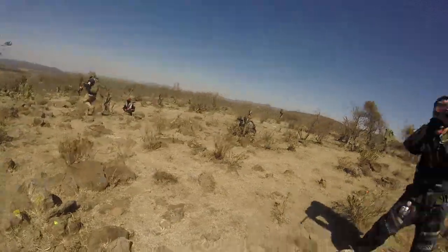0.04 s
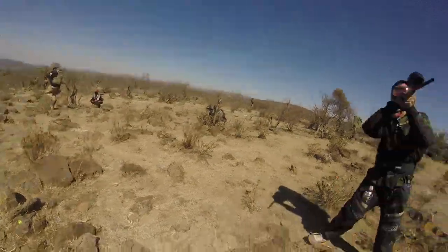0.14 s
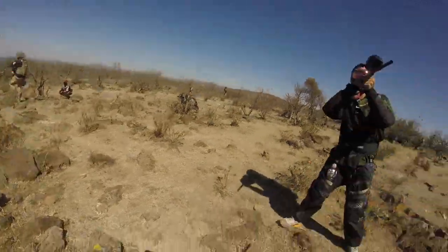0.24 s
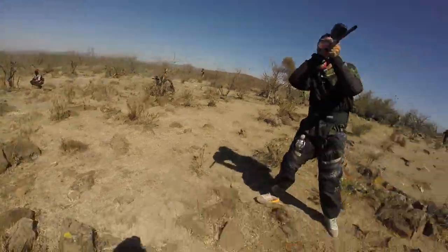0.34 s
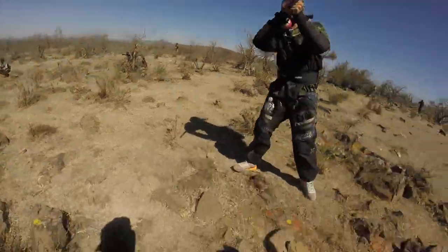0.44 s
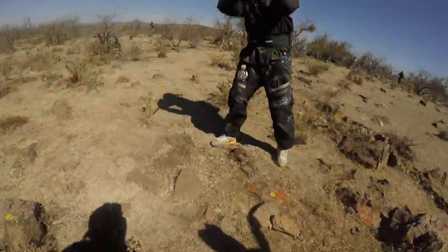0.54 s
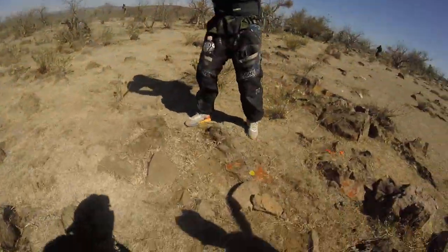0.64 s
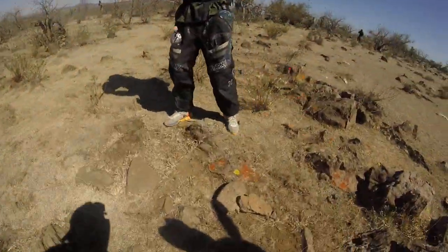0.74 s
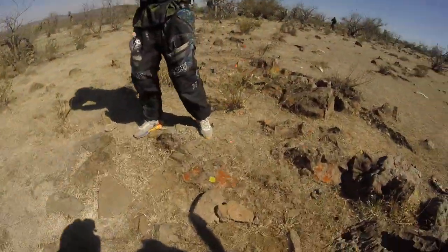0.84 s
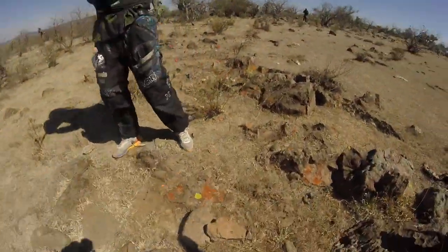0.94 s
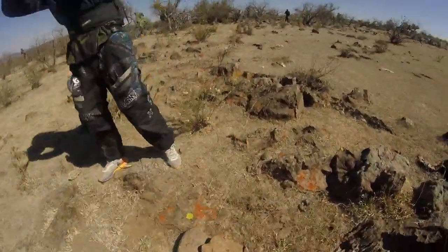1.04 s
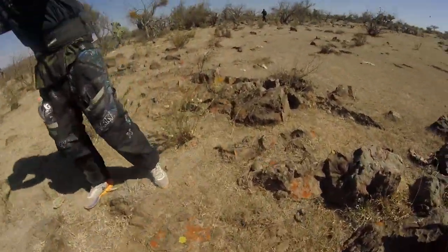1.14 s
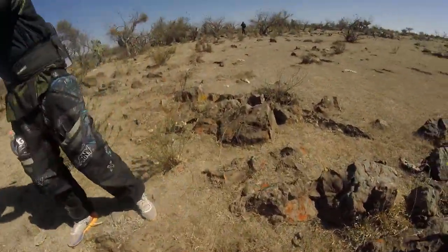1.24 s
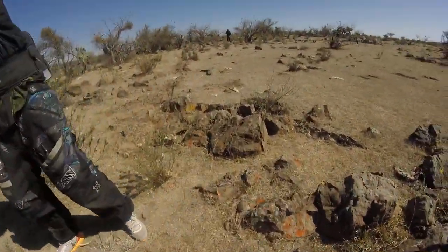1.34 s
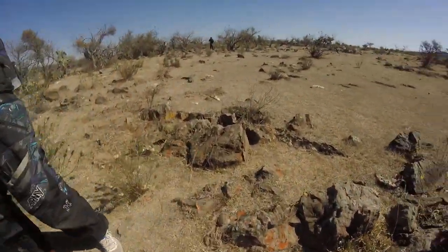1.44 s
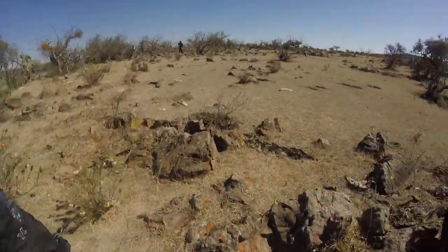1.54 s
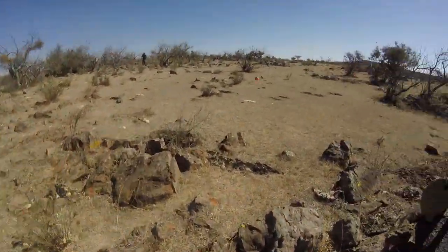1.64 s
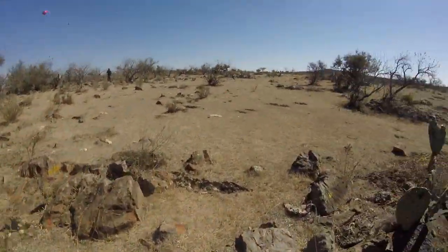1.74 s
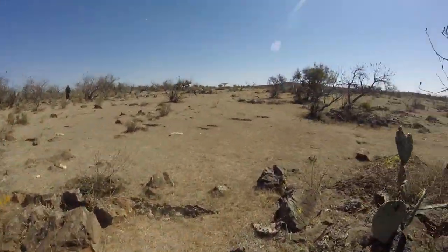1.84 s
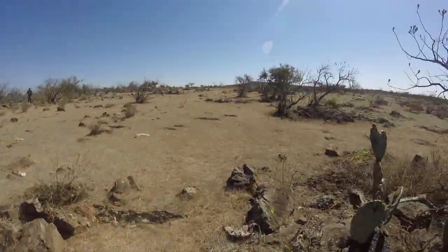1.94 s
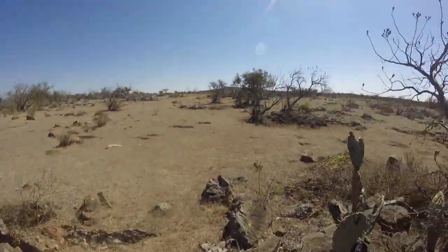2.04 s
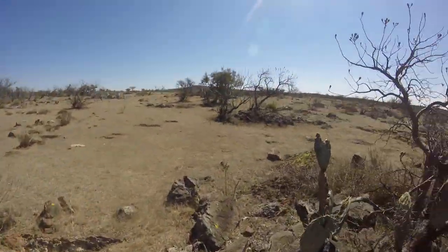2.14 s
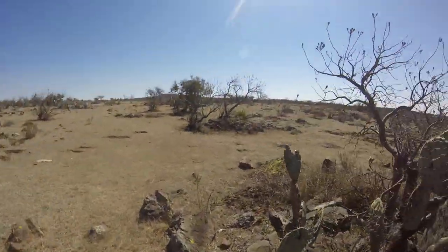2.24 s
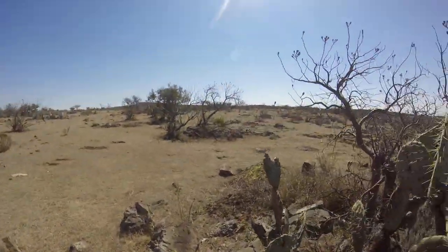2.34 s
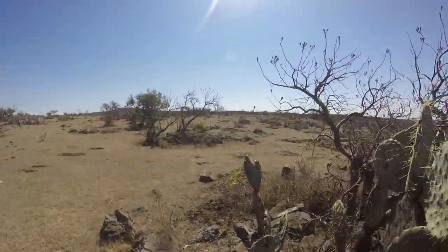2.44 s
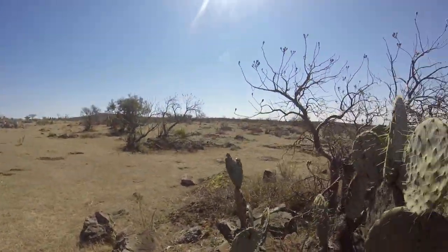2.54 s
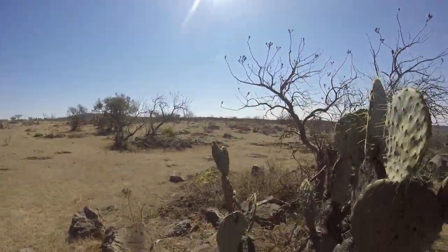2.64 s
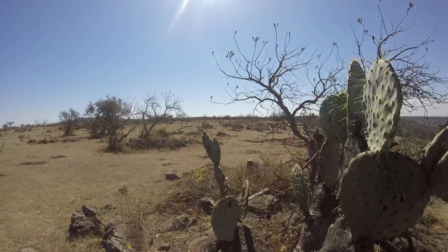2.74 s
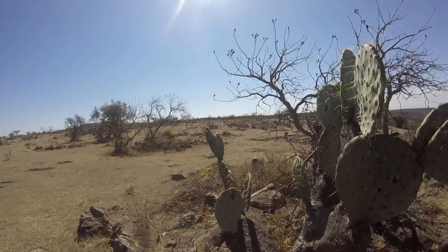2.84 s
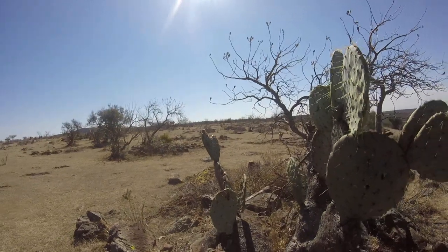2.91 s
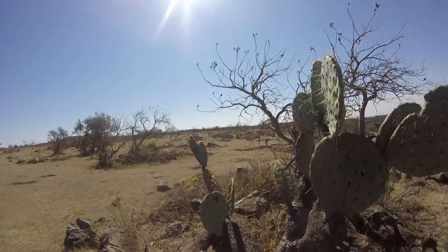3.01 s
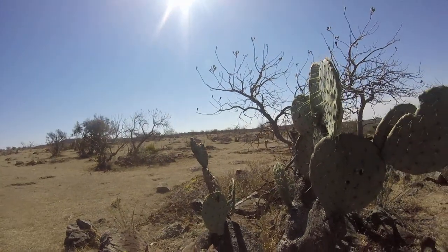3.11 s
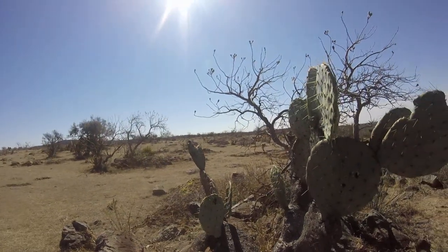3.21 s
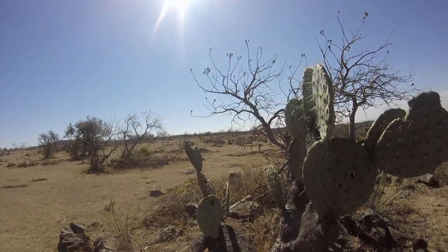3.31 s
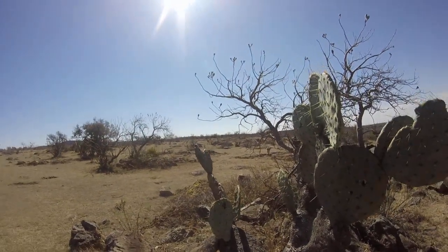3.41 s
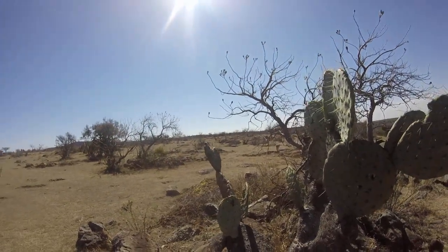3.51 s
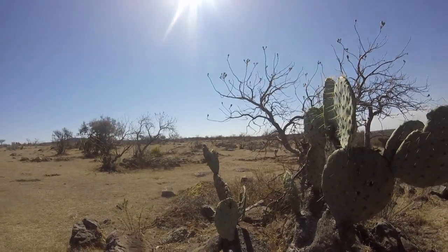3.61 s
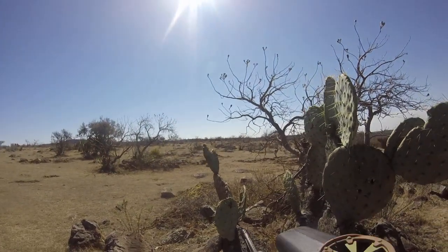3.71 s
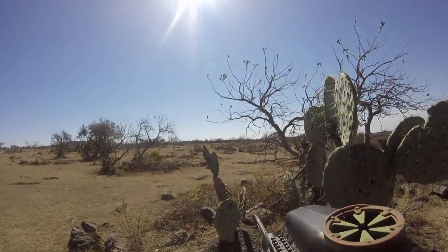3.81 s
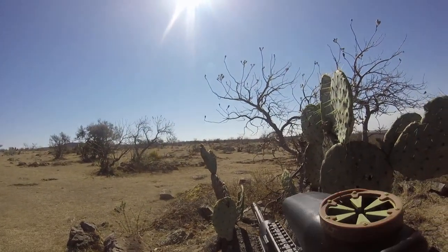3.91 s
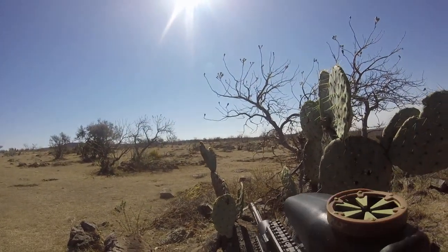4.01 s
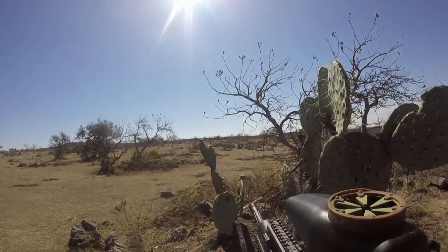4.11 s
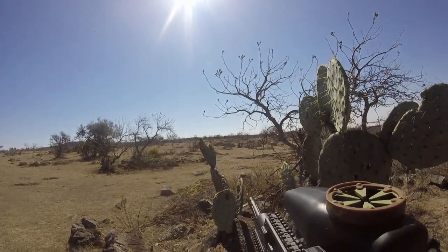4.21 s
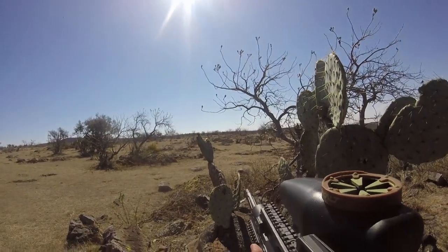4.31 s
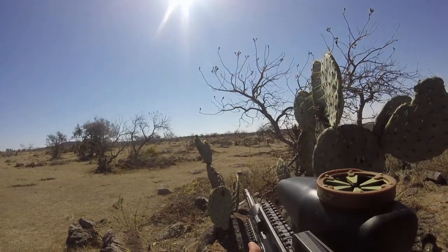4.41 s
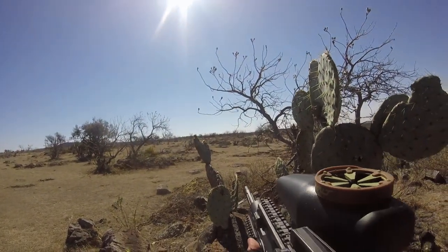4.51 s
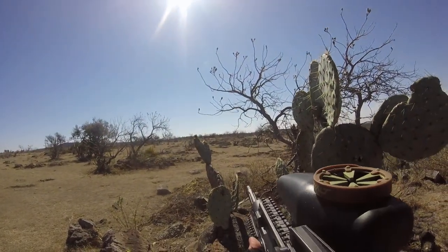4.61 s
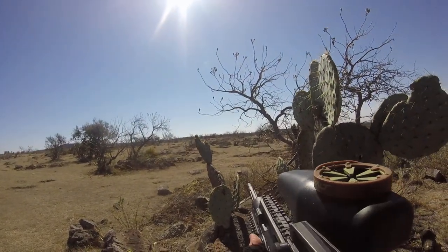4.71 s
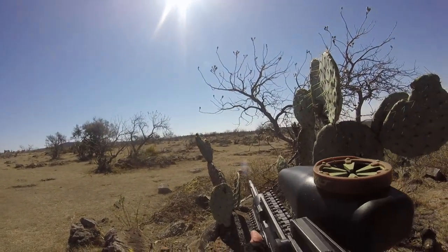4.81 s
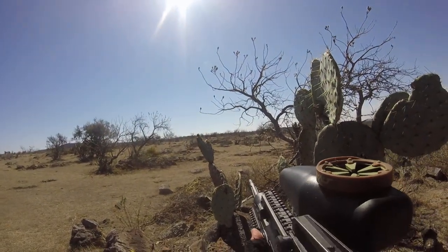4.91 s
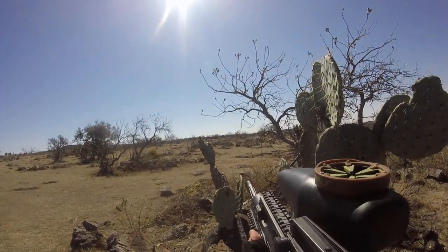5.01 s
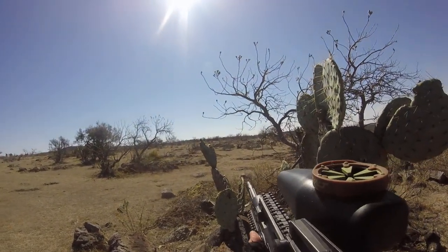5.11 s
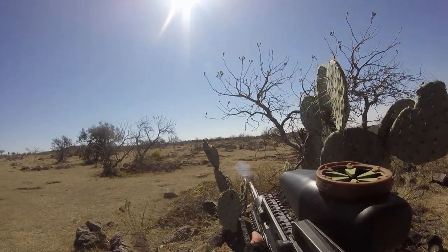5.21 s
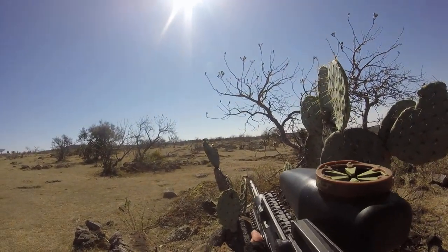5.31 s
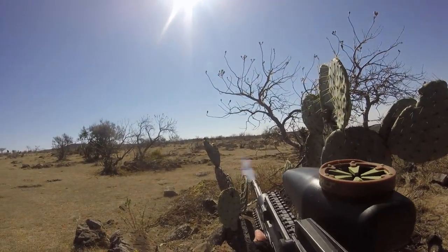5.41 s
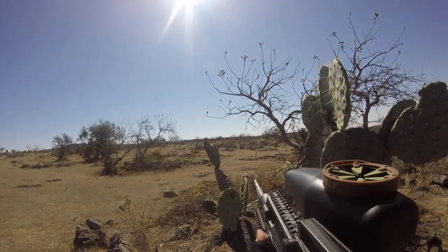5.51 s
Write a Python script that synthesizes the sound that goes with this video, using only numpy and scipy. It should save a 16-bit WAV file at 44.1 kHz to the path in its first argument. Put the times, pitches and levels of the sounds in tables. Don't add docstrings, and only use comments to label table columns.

```python
import sys
import numpy as np
from scipy import signal
from scipy.fft import rfft, irfft, next_fast_len
from scipy.io import wavfile
from scipy.ndimage import uniform_filter1d

SR = 44100
rng = np.random.default_rng(int(sys.argv[2]) if len(sys.argv) > 2 else 0)


def voltage_ratio(level):
    return 10 ** (np.asarray(level, float) / 20)


def master_out(mix):
    frames = np.transpose(np.atleast_2d(mix))
    ceiling = np.clip(frames, -1, 1)
    pcm = np.round(ceiling * 32767).astype(np.int16)
    wavfile.write(sys.argv[1], SR, pcm)


N = 244755
SPAN = 6144


def rms_one(x):
    return x / np.sqrt(np.mean(x ** 2) + 1e-20)


def curve(rows):
    s, level_db = np.transpose(rows)
    return np.interp(np.arange(N) / SR, s, level_db)


def resonate(x, modes):
    out = 0
    for k, (hz, width_hz, level_db) in enumerate(modes):
        r = np.exp(-np.pi * width_hz / SR)
        b = (1 - r * r) / 2 * np.array([1, 0, -1])
        a = [1, -2 * r * np.cos(2 * np.pi * hz / SR), r * r]
        out = out + (-1) ** k * voltage_ratio(level_db) * signal.lfilter(b, a, x)
    return out


def coloured(spectrum):
    size = next_fast_len(N)
    hz = np.maximum(np.arange(size // 2 + 1) * SR / size, 1)
    points = np.array(spectrum)
    shape = voltage_ratio(np.interp(np.log(hz), np.log(points[:, 0]), points[:, 1], left=-90))
    return rms_one(irfft(rfft(rng.standard_normal(size)) * shape, size)[:N])


def flicker(rate_hz, depth_db):
    r = np.exp(-2 * np.pi * rate_hz / SR)
    slow = signal.lfilter([1], [1, -2 * r, r * r], rng.standard_normal(N + SR))[SR:]
    return voltage_ratio(depth_db * rms_one(slow))


def swells(rows, rise_share):
    late = np.arange(0, N + 64, 64) / SR - np.array(rows)[:, :1]
    peak_db, fall_s = np.array(rows)[:, 1:2], np.array(rows)[:, 2:]
    gain = voltage_ratio(peak_db - 20 * np.maximum(late, -late / rise_share) / fall_s).sum(axis=0)
    return np.interp(np.arange(N) / 64, np.arange(len(gain)), gain)


def bursts(rows, layers, rise_s, pulse, tail_db, tail_s, hold_s=0):
    rows, t, out = np.array(rows), np.arange(SPAN) / SR, np.zeros(N + SPAN)
    rise = np.minimum(t / rise_s, 1) ** 2
    after = np.maximum(t - rise_s - hold_s, 0)
    turbulence = rng.standard_normal((len(rows), SPAN))
    dull = signal.butter(4, 7000, fs=SR)
    scatter = signal.lfilter(*dull, turbulence[:, ::-1])
    tail = scatter * voltage_ratio(tail_db - 60 * after / tail_s)
    fade_s = np.maximum(rows[:, -1:], .005)
    sound = 0
    for modes, column, trim_db, hurry in layers:
        puff = turbulence * voltage_ratio(-60 * after * hurry / fade_s)
        push = rise * (puff + tail)
        push[:, round(rise_s * SR):][:, :3] -= pulse * np.array([.25, .5, .25])
        part = resonate(push, modes)
        top = np.sqrt(uniform_filter1d(part ** 2, size=180).max(axis=1, keepdims=True))
        relative_db = rows[:, column:column + 1] if column else 0
        sound = sound + part / top * voltage_ratio(rows[:, 1:2] + relative_db + trim_db)
    for s, one in zip(rows[:, 0], sound):
        start = round(s * SR)
        out[start:start + SPAN] += one
    return out[:N]


def cycle(shots, parts):
    return [(shot[0] + delay, *rest) for shot in shots for delay, *rest in parts]


def lasting(rows, t60_s):
    return [(*row, t60_s) for row in rows]


def struck(s, hz, level_db, t60_s):
    t, out = np.arange(SPAN) / SR, np.zeros(N + SPAN)
    push_s = .0007
    fade = np.minimum(t / push_s, 1) * voltage_ratio(level_db - 60 * t / t60_s)
    out[round(s * SR):][:SPAN] = -np.cos(2 * np.pi * hz * (t - push_s)) * fade
    return out[:N]


# pitch in Hz, strength in dB per Hz.
RUMBLE = [(8.8, -24), (15, 13.5), (36, -4), (66, -2.5), (97, -16), (210, -33), (385, -39.5), (981, -51.5),
          (1200, -49), (1560, -58), (2640, -120)]
# time in seconds, level in dB.
BREEZE = [(0, -39), (1.2, -40), (1.85, -41), (2.0, -36), (2.4, -39), (2.72, -39), (2.82, -31), (3.1, -36),
          (3.4, -41), (3.7, -40), (3.85, -45), (4.5, -45), (4.8, -42), (5.55, -43.5)]
# peak in seconds, level in dB, time to fall 20 dB in seconds.
GUSTS = [(0.0, -35, .08), (.3, -44, .15), (.5, -39, .1), (.6, -39, .08), (.83, -36, .07), (1.05, -39, .15),
         (1.25, -38, .1), (1.41, -32, .12), (1.55, -32, .15), (1.82, -42, .15), (1.99, -27.5, .12),
         (2.14, -35, .06), (2.38, -37, .12), (2.65, -34, .12), (2.87, -42, .1), (3.43, -42, .08),
         (3.58, -27, .08), (4.75, -40, .15), (4.96, -37, .08), (5.36, -44, .1)]
# pitch in Hz, width in Hz, level in dB.
RUBBING = [(110.2, 22, 2.5), (204, 72, -1.5), (304, 190, -7.5)]
# peak in seconds, level in dB, time to fall 20 dB in seconds.
SLIPS = [(1.84, -54, .04), (2.52, -57, .1), (2.81, -46, .1), (2.92, -42, .1), (2.99, -38, .04),
         (3.27, -54.5, .07), (3.37, -52, .1), (3.59, -31, .05), (3.7, -53, .1), (4.08, -50, .07),
         (4.37, -47, .12)]


def wind():
    rubbing = rms_one(resonate(resonate(rng.standard_normal(N), RUBBING), RUBBING))
    pressure = coloured(RUMBLE) * flicker(3.3, 0.7)
    below_45_hz = signal.butter(3, 45, fs=SR, output="sos")
    deep = signal.sosfilt(below_45_hz, pressure * swells(GUSTS, rise_share=.45))
    rumble = voltage_ratio(4.5) * (voltage_ratio(curve(BREEZE)) * pressure + deep)
    return rumble + voltage_ratio(-4.5) * swells(SLIPS, rise_share=1.1) * rubbing * flicker(43, 2.5)


def opening_offset():
    return voltage_ratio(-35) * np.exp(-np.arange(N) / SR / .012)


# time in seconds, level in dB.
AIR = [(0.0, -56), (0.22, -67), (0.38, -53), (0.55, -64), (0.76, -51), (0.95, -66), (1.45, -58),
       (2.45, -60), (2.76, -49), (2.95, -66), (3.2, -56), (3.38, -64), (3.76, -53), (3.92, -73),
       (4.14, -55), (4.35, -74), (4.5, -51), (4.7, -68)]
# level in dB at average air, share of the air's ups and downs followed.
AIR_RANGES = [(-64, .9), (-69, .3), (-79, .1)]
AIR_FADE_DB_PER_S = [0.01, 0.3, 0.3]
# pitch in Hz, width in Hz, level in dB.
LINGER = [(1060, 250, -10), (1380, 61, -11.5), (1450, 70, 5.5)]
AIR_MID = [(2000, 810, -5.5), (2500, 110, 5.5), (3400, 420, -7)]
HISS = [(5730, 1800, 4.5), (6460, 375, 13.5), (7340, 350, 6), (8356, 1200, 0.5), (9720, 4500, -9),
        (11600, 950, -7), (14100, 3600, -14.5)]


def air():
    mean_db = -60
    swing_db = curve(AIR) - mean_db
    t = np.arange(N) / SR - N / SR / 2
    out = 0
    layers = zip([LINGER, AIR_MID, HISS], AIR_RANGES, AIR_FADE_DB_PER_S, [1450, 2800, 6500])
    for modes, (level_db, share), fade_db, cavity_hz in layers:
        ringing = resonate(rng.standard_normal(N) * flicker(9, 1.2), modes)
        gain = voltage_ratio(level_db + share * swing_db - fade_db * t)
        out = out + gain * rms_one(resonate(ringing, [(cavity_hz, 0.824 * cavity_hz, 0)]))
    return out


# pitch in Hz, strength in dB per Hz.
SELF_NOISE = [(88, -28), (150, -1), (1190, -15), (1480, -10.5), (1690, -16.5), (2450, -20), (2810, -20.5),
              (6260, -31.5), (11700, -39.5), (14800, -48), (16000, -61.5)]


def self_noise():
    return voltage_ratio(-54.5) * coloured(SELF_NOISE)


# start in seconds, ring, then body, mid and hiss relative to ring, all in dB.
OTHER = [
    (0.303, -17, -8, -10.5, -16.5),
    (0.6568, -16.5, -12, -16, -19.5),
    (1.0668, -16, -15, -20, -15),
]
OTHER_T60_S = [.027, .028, .034]
# pitch in Hz, width in Hz, level in dB.
BODY = [(740, 260, -1), (1100, 400, 6)]
OTHER_RING = [(1400, 260, 10.5), (2000, 600, 3)]
OTHER_MID = [(2400, 200, -3), (3080, 350, 2), (3500, 260, 4), (4180, 384, -6)]
OTHER_HISS = [(5200, 1500, 3), (6350, 350, 13), (7300, 400, 5), (8070, 400, 3), (9500, 1500, -10),
              (11800, 1200, -6), (14000, 1500, -22)]


def second_marker():
    shots = [(*shot, t60_s) for shot, t60_s in zip(OTHER, OTHER_T60_S)]
    layers = [(BODY, 2, 4.5, 1), (OTHER_RING, 0, -4.0, 1), (OTHER_MID, 3, 7.0, 1), (OTHER_HISS, 4, 3.0, 1.2)]
    return bursts(shots, layers, rise_s=.00065, pulse=14.0, tail_db=-21, tail_s=.15)


# start in seconds, ring in dB, mid and hiss in dB relative to ring.
FAR = [(0.6395, -62, 6, 12), (0.7382, -49, -5, -33), (1.6671, -50.5, -11.5, -12),
       (1.734, -37.5, -12.5, -21.5), (1.8961, -30, -17, -27), (1.9775, -39, -20, -15),
       (1.9875, -53, 6, -12), (2.0010, -54, 5, -30), (2.0128, -46, -8, -30), (2.0294, -64, 13, -1),
       (2.0592, -49, -6, 1), (2.1061, -37, -13, -26), (2.1804, -48, -18, -21), (2.2608, -46.5, -22, -16.5),
       (2.3386, -42, -27, -25.5), (2.4174, -43, -13, -34.5), (2.4814, -51, -4, -10), (2.4952, -42, -8, -19),
       (2.5731, -35.5, -11.5, -29), (2.6534, -34.5, -2.5, -23), (2.7307, -38, -1, -24),
       (2.7494, -47, -11.5, -29), (2.8095, -40, -14, -25), (2.8814, -42, -5.5, -25), (2.9886, -54, 0, -41),
       (3.5962, -40.5, -13, -32), (4.1335, -58, 6, -28), (4.2597, -43.5, -2, -12), (4.4393, -43, -1, -11),
       (5.5069, -53, -15, -23)]
# pitch in Hz, width in Hz, level in dB.
FAR_RING = [(1144, 380, -8.5), (1518, 140, 4.5), (1975, 130, -10)]
FAR_MID = [(2410, 130, -1), (3080, 400, -0.5), (3500, 320, 1.5), (4040, 410, -7.5)]


def far_shots():
    layers = [(FAR_RING, 0, -4.0, 1), (FAR_MID, 2, -3.0, 1), (HISS, 3, -1.5, 1.5)]
    return bursts(lasting(FAR, .036), layers, rise_s=.0005, pulse=13.0, tail_db=-26.5, tail_s=.13)


# start in seconds, pitch in Hz, level in dB, time to fade 60 dB in seconds.
PINGS = [(.738, 2000, -52, .03), (1.897, 2400, -45, .04), (1.977, 4700, -50, .02), (1.990, 1950, -47, .03),
         (2.013, 1150, -42, .03), (2.059, 4200, -52, .02), (2.107, 2400, -48, .03), (2.107, 1150, -46, .02),
         (2.482, 2500, -52, .03), (2.574, 3900, -52, .03), (2.81, 3950, -54, .02), (2.618, 1400, -50, .03),
         (1.0668, 130, -35, .03), (1.13125, 2000, -17, .03), (1.5445, 830, -25, .018),
         (2.731, 3450, -47, .025), (3.572, 120, -33, .09)]


def pings():
    return sum(struck(*ping) for ping in PINGS)


# start in seconds, ring in dB, mid and hiss in dB relative to ring,
# time to fade 60 dB in seconds.
TICKS = [
    (0.8106, -42, -1.5, -0.5, 0.028),
    (1.3797, -36.5, -14.5, -9, 0.026),
    (1.8152, -34, -21, -22, 0.038),
    (4.6703, -41.5, -10, -18, 0.04),
    (4.8278, -38, -27, -25, 0.034),
    (4.8568, -35.5, -17, -28, 0.036),
    (5.1826, -30.5, -19, -32, 0.049),
    (5.2639, -37.5, -17, -18, 0.027),
         (0.8628, -47, 7, -1, 0.018),
]
# pitch in Hz, width in Hz, level in dB.
RING = [(1170, 586, -3), (1465.5, 162.4, 12.5), (2000, 194, 2)]
MID = [(2352, 74, 3), (3050, 275, 4), (3497, 231, 4), (4180, 384, -8)]


def ticks():
    layers = [(RING, 0, -4.0, 1), (MID, 2, -.1, 1), (HISS, 3, -.1, 1)]
    return bursts(TICKS, layers, rise_s=.00026, pulse=17.0, tail_db=-30, tail_s=.1)


# start in seconds, 1.5 kHz peak, then top, mid and hiss relative to it, in dB.
NEAR = [
    (0.8832, -14, -23, 3, -8),
    (1.1304, -10.5, -16, -10, -7),
    (1.5445, -15.5, -12, -5.5, -3),
    (1.7768, -13.5, -21, -6.5, -12),
]
# low thump in dB, time for the crack to fade 60 dB in seconds.
NEAR_BODY = [(-31, .022), (-27, .024), (-19.5, .024), (-25, .024)]
# pitch in Hz, width in Hz, level in dB.
NEAR_EDGE = [(5300, 1500, -1), (6300, 380, 7), (7400, 500, -1), (8300, 600, -6)]
NEAR_TOP = [(9600, 600, -6), (11300, 600, -4), (12400, 380, 3), (14300, 1500, -7)]


def near_cracks():
    shots = [(*shot, body[1]) for shot, body in zip(NEAR, NEAR_BODY)]
    layers = [(RING, 0, .8, 1), (MID, 3, 3.0, 1), (NEAR_EDGE, 4, -.1, 1.05), (NEAR_TOP, 2, -.1, 1.1)]
    return bursts(shots, layers, rise_s=.00054, pulse=12.0, tail_db=-32, tail_s=.07)


# pitch in Hz, level in dB, time to fade 60 dB in seconds.
NEAR_THUMP = [(168, -1, .045), (420, 1, .035), (800, -12, .015)]


def near_thumps():
    out = 0
    for shot, (thump_db, _) in zip(NEAR, NEAR_BODY):
        for hz, level_db, t60_s in NEAR_THUMP:
            out = out + struck(shot[0], hz, thump_db + level_db, t60_s)
    return out


# start in seconds, ring in dB, mid and hiss in dB relative to ring, time to fade 60 dB in seconds.
NEAR_RETURN = [
    (.8893, -30, 0, -10, .022),
    (1.1335, -22, -10, -3, .02),
    (1.1385, -27, -6, -12, .015),
    (1.5492, -25, -4, -5, .025),
    (1.5562, -39, 4, -4, .035),
    (1.7825, -29, -5, -12, .025),
]


def near_returns():
    layers = [(RING, 0, -3.0, 1), (MID, 2, -.1, 1), (NEAR_EDGE, 3, .1, 1)]
    return bursts(NEAR_RETURN, layers, rise_s=.0004, pulse=6.0, tail_db=-24, tail_s=.05)


# start in seconds, 1.5 kHz peak in dB, mid and hiss in dB relative, time to fade 60 dB in seconds.
NEAR_BOLT = [
    (0.9108, -34.5, -4, -16, 0.036),
    (1.1587, -29.5, -3.5, -10, 0.025),
    (1.5728, -36, 2.5, -5.5, 0.016),
    (1.8054, -45, 7, -2, 0.023),
]
# delay from the shot in seconds, then as above.
NEAR_CYCLE = [
    (-.0095, -48, 3, -10, 0.036),
]
# pitch in Hz, width in Hz, level in dB.
NEAR_HISS = [(5650, 1300, -2), (6300, 250, 8), (7680, 1100, -5), (9300, 900, -22), (11100, 900, -16.5),
             (12520, 1200, -6.5)]


def near_parts():
    layers = [(RING, 0, -3.0, 1), (MID, 2, -.1, 1), (NEAR_HISS, 3, .1, 1)]
    parts = NEAR_BOLT + cycle(NEAR, NEAR_CYCLE)
    return bursts(parts, layers, rise_s=.0004, pulse=9.3, tail_db=-26.5, tail_s=.1)


# start in seconds, length in seconds, pitch in Hz, level in dB.
CREAKS = [
    (3.155, 0.035, 2480, -56),
    (3.575, .04, 3050, -60),
    (3.562, .06, 2400, -55),
]


def creaks():
    out = np.zeros(N)
    for s, length_s, hz, level_db in CREAKS:
        rub = rms_one(resonate(rng.standard_normal(SPAN), [(hz, 140, 0)]))
        swell = np.sin(np.pi * np.minimum(np.arange(SPAN) / SR / length_s, 1))
        out[round(s * SR):][:SPAN] += voltage_ratio(level_db) * rub * swell
    return out


# level in dB, early pitch in Hz, late pitch in Hz, fade in seconds.
KNOCK = (-11, 43, 54, .135)


def knock():
    level_db, early_hz, late_hz, fade_s = KNOCK
    start_s = 3.5705
    t, out = np.arange(SPAN) / SR, np.zeros(N)
    hz = late_hz + (early_hz - late_hz) * np.exp(-(t / .034) ** 6)
    hz = hz + 24 * np.exp(-(t / .012) ** 4)
    fade = np.minimum(t / .022, 1) ** .4 * voltage_ratio(-60 * (t / fade_s) ** 2.6)
    out[round(start_s * SR):][:SPAN] = -voltage_ratio(level_db) * np.sin(2 * np.pi * np.cumsum(hz) / SR) * fade
    return out


# start in seconds, ring in dB, mid and hiss in dB relative to ring,
# time to fade 60 dB in seconds.
BLAST = [
    (4.7250, -13.5, -7, -10.5, 0.016),
    (4.944, -9, -11, -15, 0.034),
    (5.1231, -7.5, -7, -15.5, 0.044),
    (5.3520, -8.5, -11, -17, 0.048),
]
# delay in seconds, then as above.
OWN_CYCLE = [(-.0262, -55.5, 7, -1.5, 0.03), (-.0220, -35.5, -2.5, -12, .05), (-.0155, -46, -1, -8, .05),
             (-.009, -37, -6.5, -10.5, 0.097), (.0132, -30, -3, -8, .03), (0.0226, -39.5, 6.5, 4.5, 0.029),
             (.0305, -39, -3.5, -2, .035), (.058, -54.5, -1, -10, 0.16)]
# pitch in Hz, width in Hz, level in dB.
SEAR_RING = [(1150, 400, -8), (1450, 200, 3), (1920, 170, 2)]
SEAR_MID = [(2450, 200, -5), (3000, 270, 3), (3500, 300, -1), (4200, 400, -8)]
OWN_HISS = [(5630, 450, -4), (6385, 550, -1), (7540, 450, 1.5), (8380, 450, -0.5), (10500, 2600, -22)]


def own_parts():
    layers = [(SEAR_RING, 0, -.1, 1), (SEAR_MID, 2, -.1, 1), (OWN_HISS, 3, -.1, 2.2)]
    return bursts(cycle(BLAST, OWN_CYCLE), layers, rise_s=.0009, pulse=3.3, tail_db=-25, tail_s=.062)


BLAST_TOP_DB = [-26, -29, -33, -33]
# pitch in Hz, width in Hz, level in dB.
OWN_TOP = [(10300, 1500, -1), (12300, 700, 1), (14000, 1200, -8)]


def own_blasts():
    shots = [(*shot[:4], top_db, shot[4]) for shot, top_db in zip(BLAST, BLAST_TOP_DB)]
    layers = [(RING, 0, -3.0, 1), (MID, 2, -.6, 1), (OWN_HISS, 3, -.1, 1.1), (OWN_TOP, 4, .9, 1.3)]
    return bursts(shots, layers, rise_s=.004, pulse=.1, tail_db=-30.5, tail_s=.098, hold_s=.0044)


# pitch in Hz, level in dB, delay of the peak in seconds.
BARREL = [(92, -28, .005), (150, -25.5, .0042), (259, -15, .0048), (373, -15.5, .0051), (419, -32, .0126),
          (551, -21.5, .0032), (710, -24.5, 0.0062), (860, -26, .005), (1053, -24, 0.0042),
          (1490, -13, 0.0042), (1900, -18.5, 0.008), (2451, -16, 0.0051)]


def barrel():
    t, out = np.arange(SPAN) / SR, np.zeros(N + SPAN)
    shots_sing_db = [1.5, 7, 4.5, -.6]
    chance = rng.standard_normal((len(BLAST), len(BARREL), 2))
    for shot, draws, sing_db in zip(BLAST, chance, shots_sing_db):
        for (hz, level_db, peak_s), (detune, loudness) in zip(BARREL, draws):
            swell = (t / peak_s * np.exp(1 - t / peak_s)) ** 2
            crest_s = .0077 * (hz < 450)
            tone = np.cos(2 * np.pi * hz * (1 + 0.012 * detune) * (t - crest_s))
            strength = voltage_ratio(level_db + .7 * loudness + sing_db * (1300 < hz < 1600))
            out[round(shot[0] * SR):][:SPAN] += strength * swell * tone
    return out[:N]


def tank():
    t, out = np.arange(2 * SPAN) / SR, np.zeros(N + 2 * SPAN)
    hum_hz, t60_s = 425, .17
    for shot, level_db in zip(BLAST, [-33, -36, -43, -29]):
        fade = np.minimum(t / .012, 1) * voltage_ratio(level_db - 60 * t / t60_s)
        out[round(shot[0] * SR):][:2 * SPAN] += np.sin(2 * np.pi * hum_hz * t) * fade
    return out[:N]


# start in seconds, ring in dB, then top, mid and hiss in dB relative to ring.
BOLT = [
    (4.7418, -19, -27, -6, -12),
    (4.9600, -21.5, -24, 0, -12.5),
    (5.1390, -24.5, -22, 3, -7.5),
    (5.3680, -25.5, -20, 4, -13),
]


def own_bolt():
    layers = [(RING, 0, 2.1, 1), (MID, 3, 3.9, 1), (OWN_HISS, 4, 5.0, .91), (OWN_TOP, 2, 5.0, 1.6)]
    return bursts(lasting(BOLT, .026), layers, rise_s=.00032, pulse=6.0, tail_db=-36.5, tail_s=.071)


# first return in dB, seconds until they stop.
ECHO = [
    (-45, .125),
    (-39, .13),
    (-38, .115),
    (-38, .12),
]
# pitch in Hz, width in Hz, level in dB.
ECHO_RING = [(1050, 150, -14), (1396, 70, -9), (1490, 35, 3), (2450, 130, -19.5), (3330, 410, -31.5)]


def echoes():
    delay_s, fade_db_per_s, stop_db_per_s = .041, 120, 900
    gain = np.zeros(N)
    for shot, (level_db, stop_s) in zip(BLAST, ECHO):
        late = np.arange(N) / SR - shot[0]
        loss_db = fade_db_per_s * np.maximum(late - delay_s, 0)
        loss_db = loss_db + stop_db_per_s * np.maximum(late - stop_s, 0)
        gain += np.clip(1 + (late - delay_s) / .02, 0, 1) * voltage_ratio(level_db - loss_db)
    return gain * rms_one(resonate(rng.standard_normal(N), ECHO_RING)) * flicker(40, 2.0)


def scene():
    background = wind() + opening_offset() + air() + self_noise()
    others = second_marker() + far_shots() + pings() + ticks()
    neighbour = near_cracks() + near_thumps() + near_returns() + near_parts()
    mount = creaks() + knock()
    own = own_parts() + own_blasts() + barrel() + tank() + own_bolt() + echoes()
    return (background + others + neighbour + mount + own)[None]


def band_limit(x):
    return signal.sosfilt(signal.butter(12, 16490, fs=SR, output="sos"), x)


def record(dry):
    rounded = 1.438 * np.tanh(dry / 1.596)
    dulled = signal.sosfilt(signal.butter(8, 15150, fs=SR, output="sos"), rounded)
    return band_limit(dulled)


dry = scene()
out = record(dry)
master_out(out)
```